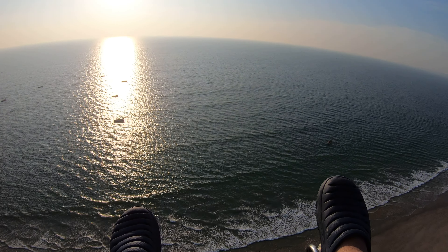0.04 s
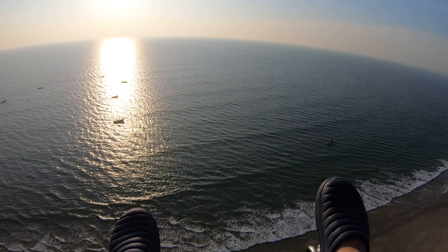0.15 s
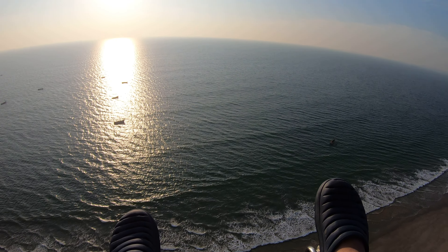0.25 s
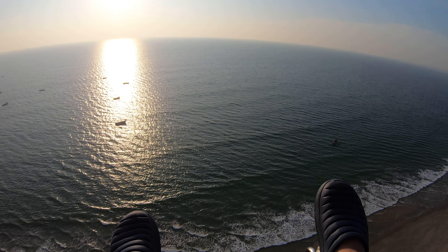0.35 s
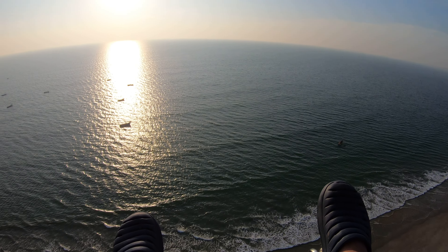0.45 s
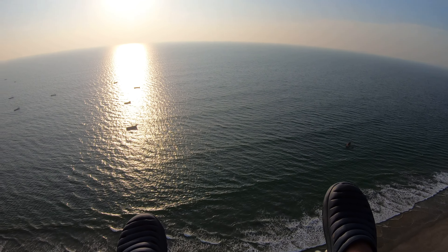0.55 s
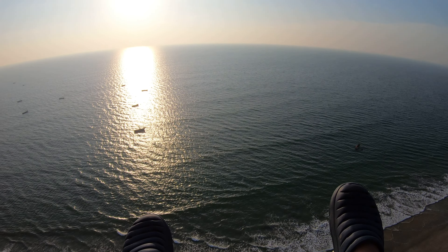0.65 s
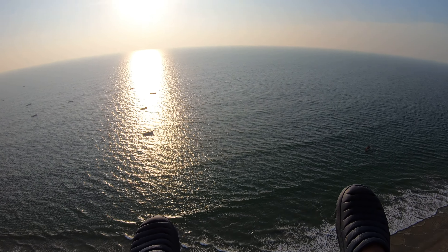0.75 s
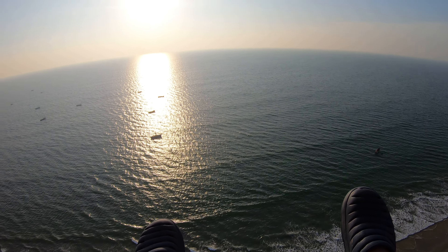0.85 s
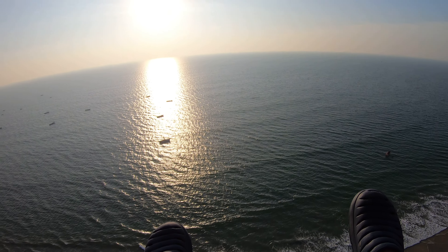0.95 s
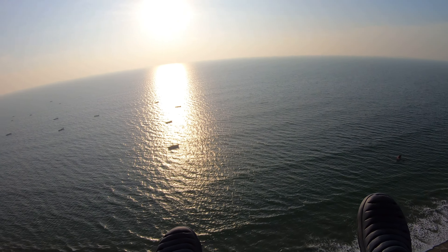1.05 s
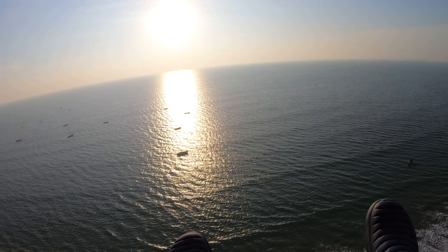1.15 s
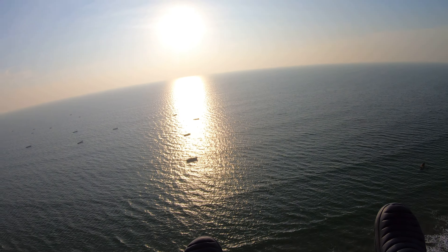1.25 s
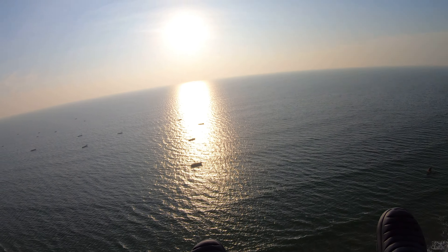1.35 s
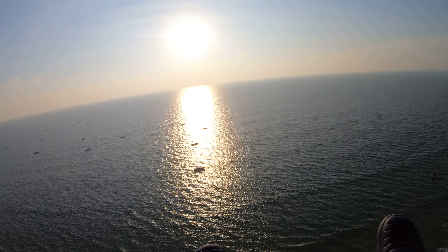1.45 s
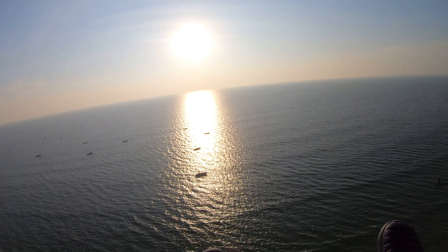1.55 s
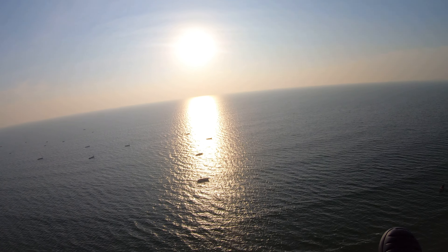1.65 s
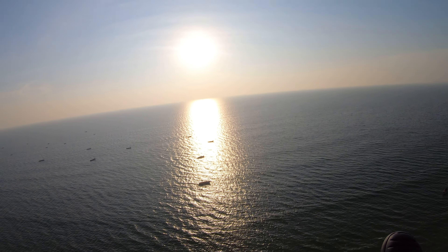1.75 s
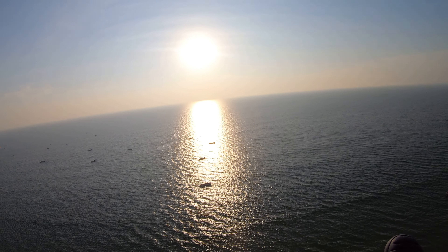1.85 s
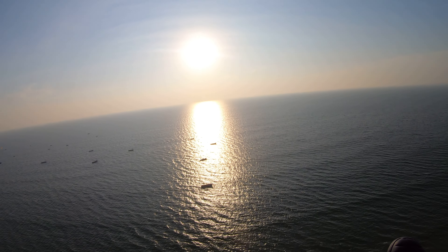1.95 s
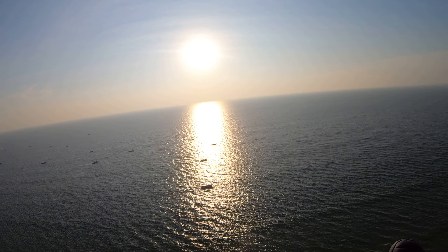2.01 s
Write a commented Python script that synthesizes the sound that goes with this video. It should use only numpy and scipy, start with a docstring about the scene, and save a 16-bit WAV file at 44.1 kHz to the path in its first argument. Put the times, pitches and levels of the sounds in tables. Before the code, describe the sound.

Heard from the seat of a powered paraglider over the sea, wind rumbles and hisses on the microphone over a close engine drone and humming, swishing blades. Short puffs of air lead into a hollow gust that cracks loose cloth near the start. The engine eases a little, then gradually speeds up while the buffeting comes in uneven surges. The hub ticks faintly with each turn.

```python
"""A powered paraglider's two-stroke twin and geared three-blade propeller, close up, from the seat.
Cruising over the sea, the throttle eases, then opens. Exhaust pulses drone through the silencer,
the blades hum and swish, and play in the hub gives thin ticks on every turn.
The mono microphone sits in the airflow, which buffets it and rushes past;
about a second in, a gust whooshes by and snaps loose cloth."""
import sys
import numpy as np
from scipy import signal
from scipy.fft import rfft, irfft, next_fast_len
from scipy.io import wavfile
from scipy.ndimage import uniform_filter1d, minimum_filter1d, map_coordinates

SR = 44100
rng = np.random.default_rng(int(sys.argv[2]) if len(sys.argv) > 2 else 0)


def unload_audio(sound):
    """Save the sound as a 16-bit wav file, at the path given as the first command line argument."""
    columns = np.transpose(np.atleast_2d(sound))
    # keep every value between -1 and 1, then stretch to whole-number steps
    steps = np.round(np.clip(columns, -1, 1) * 32767)
    wavfile.write(sys.argv[1], SR, steps.astype(np.int16))


N = 401310
CRUISE_HZ = 97.4  # firing rate in level flight

# Wind buffeting on the microphone: time_s, level_db
BUFFET_LEVEL = [(0.0, -24), (0.55, -21.5), (0.95, -27), (1.85, -25), (2.35, -30), (2.65, -27.5),
                (3.15, -26), (3.35, -18.5), (3.6, -21.5), (4.7, -22), (4.9, -27), (5.1, -16.5), (5.8, -21),
                (6.15, -22), (6.5, -14), (6.75, -28.5), (7.95, -19), (9.1, -22.5)]
# Short bursts of noise, wind puffs and a brief low swell near 280 Hz at 4.2 s:
# start_s, pitch_hz, level_db, decay_s
NOISE_BURSTS = [(.025, 1897, -33, 0.1), (.06, 401.5, -18.5, 0.037), (0.309, 349.6, -20, 0.069),
                (0.369, 429, -27.5, 0.044), (.43, 339, -19, 0.032), (0.505, 3480, -35.5, 0.033),
                (.65, 349.6, -18.5, 0.047), (.7, 452, -21, 0.035), (.778, 842, -18, 0.014),
                (.79, 384, -21, 0.026), (.85, 790, -24.5, 0.044), (0.901, 2010, -25, 0.018),
                (.935, 1430, -30, .025), (1.068, 3095, -33, 0.022), (1.093, 1326, -22, 0.012),
                (1.13, 450, -19.5, 0.046), (1.15, 1395, -33, 0.11), (2.22, 1304, -36.5, .07),
                (4.18, 277.6, -14, 0.099), (5.582, 1150, -31, .06), (6.189, 1245, -32, .04),
                (6.31, 1090, -29, .05), (6.45, 1490, -33, .03)]
# Strength of the airflow past the seat: time_s, level_db
FLOW_LEVEL = [(0.0, -22), (0.1, -22.5), (0.19, -27), (0.35, -25), (0.6, -27.5), (0.7, -24), (0.75, -22.5),
              (0.86, -20.5), (0.99, -31.5), (1.08, -29.5), (1.16, -23), (1.36, -28), (1.75, -30),
              (2.95, -31), (3.2, -26.5), (3.75, -26.5), (5.2, -26.5), (5.6, -25.5), (6.47, -22.5),
              (6.6, -28.5), (7.2, -26), (8.55, -24.5), (9.1, -27.5)]
# Air hiss apart from the gusts: time_s, level_db
HISS_LEVEL = [(0.0, -44.5), (0.42, -48), (0.58, -43), (1.25, -43.5), (1.85, -44), (2.5, -47.5),
              (3.45, -45.5), (5.0, -46.3), (5.9, -42), (6.45, -43.5), (6.6, -44), (7.65, -45.5),
              (8.0, -41.5), (9.1, -44.5)]
# Gusts tearing up the airflow: peak_s, rise_s, fall_s, strength (0-1)
GUST_SWELLS = [(.055, 0.1, .08, .7), (.88, .1, 0.24, 0.91), (1.1, 0.046, .33, .56)]
# The gust's hollow whoosh: time_s, pitch_hz, level_db
WHOOSH_SWEEP = [(.6, 380, -48), (.76, 600, -36), (.87, 1053, -27.5), (.94, 1450, -33), (1.0, 2320, -38.5),
                (1.07, 2790, -46), (1.2, 2140, -36), (1.33, 1744, -34.5), (1.75, 1614, -39),
                (2.4, 1404, -63)]
# Snaps of loose cloth: start_s, level_db
CLOTH_SNAPS = [(.748, -18.5), (.779, -20), (.832, -21), (0.847, -20), (.866, -16), (0.883, -18),
               (.906, -19), (1.07, -21)]
# Noise spectra of the wind, the bursts and the cloth: frequency_hz, density_db
BUFFET_SPECTRUM = [(13, -27.5), (23, -13.5), (33, -0.5), (56, 3.5), (102, 2.5), (152, 2.5), (222, 3),
                   (292, -4), (362, -15), (482, -47.5)]
BURST_SPECTRUM = [(350, -29), (700, -4.5), (1000, 4), (1300, -9), (1700, -33)]
ROAR_SPECTRUM = [(152, -23), (282, 6.5), (402, -1.5), (552, -2.5), (802, -7.5), (1060, -14.5),
                 (1610, -25.5)]
RUSH_SPECTRUM = [(510, -32), (860, -0.5), (1110, 0), (1410, -2), (2010, -8), (2510, -12.5), (3510, -27)]
HISS_SPECTRUM = [(1600, -24), (2400, -2), (3000, 0.5), (3700, -3), (4800, -9.5), (5600, -19.5),
                 (7000, -42.5)]
WHOOSH_SPECTRUM = [(450, -32), (800, -4.5), (1000, -4), (1250, -11), (2200, -35)]
CLOTH_SPECTRUM = [(300, -24), (600, 2), (1300, 2.5), (2500, -5.5), (4200, -11.5), (5200, -27), (6500, -40)]

# Hub noise at the seat: time_s, level_db, relative_squeal_db
HUB_LEVELS = [(0.0, -59, -15), (0.96, -57, -14), (1.34, -59.5, -12), (1.9, -57.5, -8.5), (2.45, -58, -7),
              (2.72, -54.5, -6.5), (3.05, -57, -7), (5.0, -54, -6), (5.9, -53, -10), (6.84, -59, -5.5),
              (7.91, -55.5, -9), (8.9, -58, -10)]
# Contacts in one hub turn: place_turns, cruise_level_db, gain_db_per_hz (of firing rate below cruise)
HUB_CONTACTS = [(.32, -12.5, 0.74), (.505, -4, 0.07), (.835, -8.5, .5)]
# Noise spectra of the hub, the squeal at cruising speed: frequency_hz, density_db
FIZZ_SPECTRUM = [(3800, -24.5), (5100, 1), (6100, -2), (7010, -0.5), (8310, -1), (9410, -4.5), (9900, -19),
                 (10800, -20), (12000, -28), (13700, -34), (15000, -44.5)]
RING_SPECTRUM = [(5500, -31), (7500, -8.5), (8400, -10), (9300, 1), (9650, -1.5), (10000, -4),
                 (10600, -1.5), (11200, -7.5), (12000, -16), (13500, -16.5), (14200, -30), (15000, -34.5)]
SQUEAL_SPECTRUM = [(8200, -25.5), (9000, -1.5), (9450, 2), (9900, -16)]

# How the low blade tones reach the seat: frequency_hz, gain_db
PATH_TO_SEAT = [(55, -16.5), (94, -4.5), (100, -21), (107, -8), (114, -5), (145, -7.5), (168, -9.5),
                (190, -2.5), (205, -3), (226, 0), (240, -14), (340, -14.5)]
# Blade slap: time_s, level_db
SLAP_LEVEL = [(0, -37), (2.5, -38.5), (4, -37), (4.7, -34), (5.75, -35), (6.7, -40.5), (9.1, -38.5)]
# High blade tones in the slap: multiple of the blade-passing rate, relative_db
SLAP_HARMONICS = [(7, -4), (8, -1.5), (9, -5), (10, -13), (11, -11), (12, -7.5), (13, -8), (14, -9),
                  (15, -12.5), (16, -11.5), (17, -9), (18, -12.5)]
# A resonance colouring the slap: frequency_hz, gain_db
SLAP_RESONANCE = [(380, 1), (445, -2), (497, 4), (540, -2.5), (585, 5.5), (640, -2)]

# Engine speed: time_s, firing_hz
FIRING_RATE = [(0.0, 84.15), (0.5, 83.95), (1.25, 81.76), (1.55, 81.66), (2.25, 84.09), (2.75, 86.53),
               (3.3, 91.59), (3.7, 93.13), (4.75, 96.0), (5.25, 96.42), (6.45, 98.51), (7.15, 98.4),
               (9.1, 100.61)]
# Exhaust note and propeller drone at the seat: time_s, exhaust_db, propeller_db
DRONE_LEVELS = [(0.0, -18.5, -21.5), (0.6, -20, -21.5), (0.83, -19, -20.5), (0.93, -28, -27),
                (1.08, -18.5, -23), (1.6, -19, -28.5), (2.0, -17.5, -29.5), (2.4, -17, -30.5),
                (2.8, -15.5, -17), (3.1, -16.5, -23), (3.5, -23, -20.5), (3.8, -19.0, -23),
                (4.45, -19.5, -19.5), (5.55, -19, -29.5), (5.95, -22, -19.5), (6.55, -23, -23.5),
                (7.2, -16.5, -19), (8.0, -23.5, -21.5), (8.25, -22, -21.5), (8.4, -24, -21.5),
                (9.1, -21.5, -19.5)]
# What the silencer passes of the three lowest exhaust harmonics: frequency_hz, gain_db
SILENCER_RESPONSE = [(80, -14), (88, -14), (100, -7), (163, -2.5), (177, -0.5), (186, -3), (200, -4),
                     (245, -4.5), (270, -6), (286, -2.5), (302, -3.5)]
# Weaker exhaust harmonics: multiple of the firing rate, level_db
EXHAUST_OVERTONES = [(4, -43), (5, -49), (6, -55), (7, -51.5)]


def amp(db):
    """Decibels to gain."""
    return 10 ** (np.asarray(db) / 20)


def unit(x):
    """Scale to rms 1."""
    return x / np.sqrt(np.mean(x ** 2) + 1e-20)


def curves(rows):
    """One value per sample for each column after the time."""
    time_s, *columns = np.transpose(rows)
    return [np.interp(np.arange(N) / SR, time_s, column) for column in columns]


def db_at(points, hz, outside_db=None):
    """Read frequency_hz, gain_db points on a log frequency axis."""
    points_hz, db = np.transpose(points)
    return np.interp(np.log(hz), np.log(points_hz), db, left=outside_db, right=outside_db)


def wobble(rate_hz):
    """A smooth random curve with rate_hz knots a second."""
    knots = rng.standard_normal(int(N * rate_hz / SR) + 4)
    return map_coordinates(knots, [np.arange(N) * rate_hz / SR])


def filtered(x, response):
    """Filter by a gain given as a function of frequency."""
    size = next_fast_len(N + 8192)
    return irfft(rfft(x, size) * response(np.fft.rfftfreq(size, 1 / SR)), size)[:N]


def noise(spectrum):
    """Noise of rms 1 with the given spectrum."""
    white = rng.standard_normal(N)
    return unit(filtered(white, lambda hz: amp(db_at(spectrum, hz + 1, outside_db=-120))))


def gliding_noise(spectrum, pitch_ratio):
    """A noise band read faster or slower, so that its pitch slides."""
    return map_coordinates(noise(spectrum), [np.cumsum(pitch_ratio) % (N - 1)])


def harmonic(cycles, order):
    """A sine of rms 1 locked to a rotation."""
    return np.sqrt(2) * np.sin(2 * np.pi * (order * cycles + rng.random()))


def bump(cycles, place, width):
    """A smooth pulse at one place in every cycle."""
    return np.exp(-.5 * (((cycles - place + .5) % 1 - .5) / width) ** 2)


def wind_buffet(deep_db=6, small_db=-20.5, split_hz=130):
    """Eddies press on the microphone port: the deep ones surge, the small ones stay steadier."""
    level_db, = curves(BUFFET_LEVEL)
    eddies = noise(BUFFET_SPECTRUM) * amp(1.2 * wobble(12))
    deep = filtered(eddies, lambda hz: 1 / (1 + (hz / split_hz) ** 2) ** 2)
    return amp(level_db + deep_db) * deep + amp(small_db) * (eddies - deep)


def noise_bursts(attack_s=0.0038, gain_db=1, centre_hz=1000):
    """Wind puffs and one brief low swell: each is a short burst of a noise band at its own pitch."""
    band, out = noise(BURST_SPECTRUM), np.zeros(N)
    t = np.arange(SR // 2) / SR
    offsets = rng.random(len(NOISE_BURSTS)) * N / 2
    for (start_s, pitch_hz, db, decay_s), offset in zip(NOISE_BURSTS, offsets):
        burst = map_coordinates(band, [offset + t * SR * pitch_hz / centre_hz])
        envelope = (1 - np.exp(-t / attack_s)) * np.exp(-t / decay_s)
        out[round(start_s * SR):][:len(t)] += amp(db + gain_db) * envelope * burst
    return out


def gustiness():
    """Each gust swells to its peak and dies away; 0 is smooth air."""
    t = np.arange(N) / SR
    gust = np.zeros(N)
    for peak_s, rise_s, fall_s, strength in GUST_SWELLS:
        before, after = np.minimum(t - peak_s, 0), np.maximum(t - peak_s, 0)
        gust = np.maximum(gust, strength * np.exp(-(before / rise_s) ** 2 - after / fall_s))
    return gust


def slipstream(passes, drone, roar_db=-26, rush_db=-34, hiss_db=-2, swish_db=2.7, ruffle=0.14):
    """Air streams past the seat: each blade swells it, the drone ruffles it, gusts tear and brighten it."""
    flow_db, = curves(FLOW_LEVEL)
    edge_db, = curves(HISS_LEVEL)
    surge_db, bright_db = flow_db - flow_db.mean(), edge_db - edge_db.mean()
    gust = gustiness()
    swish = amp((0.5 - gust) * swish_db * np.cos(2 * np.pi * (passes - .85)))
    crest = 1 + 0.2 * bump(passes, place=.82, width=0.041)
    chop = swish * crest * np.exp(ruffle * unit(drone))
    flutter = amp(0.82 * wobble(46) + 2.4 * gust * wobble(150))
    roar = amp(roar_db + 0.95 * surge_db - 2 * gust + 0.49 * wobble(14)) * noise(ROAR_SPECTRUM)
    rush_gain = amp(rush_db + 0.51 * surge_db + 0.36 * bright_db + 2 * gust + 0.2 * wobble(18))
    rush = rush_gain * noise(RUSH_SPECTRUM)
    hiss = amp(hiss_db + edge_db + 11 * gust + .3 * wobble(7.3)) * noise(HISS_SPECTRUM)
    return (roar + rush) * unit(chop * flutter) + hiss * unit(chop ** 0.52 * flutter)


def gust_whoosh(tear_db=1.0, centre_hz=1000):
    """The gust sheds eddies off an edge: a hollow band of noise whose pitch follows the air speed."""
    pitch_hz, level_db = curves(WHOOSH_SWEEP)
    band = gliding_noise(WHOOSH_SPECTRUM, pitch_hz / centre_hz)
    return amp(level_db + tear_db * wobble(110)) * band


def cloth_flaps(attack_s=.0006, decay_s=0.004):
    """Loose cloth snaps in the gust: each flap is a crack of broad noise."""
    t, envelope = np.arange(SR // 10) / SR, np.zeros(N)
    snap = (1 - np.exp(-t / attack_s)) * np.exp(-t / decay_s)
    for start_s, db in CLOTH_SNAPS:
        envelope[round(start_s * SR):][:len(t)] += amp(db) * snap
    return envelope * noise(CLOTH_SPECTRUM)


def hub_ticks(turns, firing_hz, tick_db=-8.5, slack_db=-9, grip_hz=87, rub=0.42):
    """Play in the hub rubs, scrapes and fizzes; with speed one scrape takes over and its squeal rises."""
    level_db, squeal_db = curves(HUB_LEVELS)
    mean_db = level_db.mean()
    rise_db = level_db - mean_db
    slack = .5 - .5 * np.tanh((firing_hz - grip_hz) / 3)
    scrapes = sum(amp(db + db_per_hz * (CRUISE_HZ - firing_hz)) * bump(turns, place, width=0.039)
                  for place, db, db_per_hz in HUB_CONTACTS)
    scrapes *= amp(.9 * wobble(32))
    # On the heavy side of each turn, rubbing and fizz swell and the squeal sags in pitch.
    load = unit(1 + 0.25 * bump(turns, place=.57, width=0.25))
    sag = 1 + .25 * np.sin(2 * np.pi * turns) / (2 * np.pi)
    pitch_ratio = (firing_hz / CRUISE_HZ) ** .75 * sag
    squeal = amp(squeal_db) * unit(scrapes) * gliding_noise(SQUEAL_SPECTRUM, pitch_ratio)
    ring = amp(tick_db + slack_db * slack) * unit(rub * load ** 2 + scrapes) * noise(RING_SPECTRUM)
    fizz = amp(0.3 + 0.69 * rise_db) * load * noise(FIZZ_SPECTRUM)
    return amp(mean_db) * (amp(1.55 * rise_db) * (ring + squeal) + fizz)


def propeller(passes, pass_hz, level_db, trim_db=1.03):
    """Blade tones waver as the blades meet uneven air; blade slap lifts the high ones."""
    slap_db, = curves(SLAP_LEVEL)
    hum = sum(amp(db_at(PATH_TO_SEAT, k * pass_hz) + wobble(5)) * harmonic(passes, k)
              for k in range(1, 7))
    slap = sum(amp(db + db_at(SLAP_RESONANCE, k * pass_hz) + 0.8 * wobble(3.6)) * harmonic(passes, k)
               for k, db in SLAP_HARMONICS)
    return amp(level_db + trim_db) * hum + amp(slap_db) * slap


def engine(firings, firing_hz, level_db, roughness=0.034, jitter_cycles=0.0032, waver_db=0.96):
    """The lowest exhaust harmonics slide through the silencer's resonances; no two firings are alike."""
    cycles = firings + jitter_cycles * wobble(42)
    note = np.zeros(N)
    for k in range(1, 4):
        silenced_db = level_db + 0.5 + db_at(SILENCER_RESPONSE, k * firing_hz)
        note += amp(silenced_db + waver_db * wobble(6.5)) * harmonic(cycles, k)
    overtones = sum(amp(db) * harmonic(cycles, k) for k, db in EXHAUST_OVERTONES)
    return (note + overtones) * (1 + roughness * wobble(72))


def scene(gear_ratio=2.6195, blades=3):
    """The mix at the seat: the engine's speed drives the propeller and hub through the gear."""
    firing_hz, = curves(FIRING_RATE)
    exhaust_db, propeller_db = curves(DRONE_LEVELS)
    turn_hz = firing_hz / 2 / gear_ratio  # two firings for each turn of the crank
    firings, turns = np.cumsum(firing_hz) / SR, np.cumsum(turn_hz) / SR
    passes, pass_hz = blades * turns, blades * turn_hz
    drone = engine(firings, firing_hz, exhaust_db) + propeller(passes, pass_hz, propeller_db)
    air = wind_buffet() + slipstream(passes, drone) + gust_whoosh() + noise_bursts() + cloth_flaps()
    return (air + hub_ticks(turns, firing_hz) + drone)[None]


def peak_limiter(x, ceiling_db=-4.0, hold_s=0.019):
    """The gain ducks smoothly around every peak above the ceiling."""
    size = int(hold_s * SR)
    gain = np.minimum(1, amp(ceiling_db) / (np.abs(x) + 1e-9))
    return x * uniform_filter1d(minimum_filter1d(gain, size), size)


def record(dry, gain_db=0.28, top_hz=15100):
    """The microphone feeds a peak limiter, and nothing passes above the band limit."""
    limited = peak_limiter(dry[0] * amp(gain_db))
    soft_ends = signal.windows.tukey(N, .001)
    return filtered(limited * soft_ends, lambda hz: hz < top_hz)[None]


dry = scene()
out = record(dry)
unload_audio(out)
```